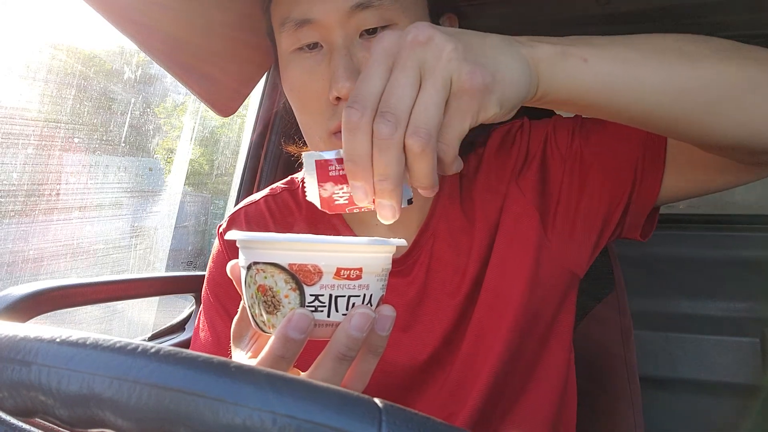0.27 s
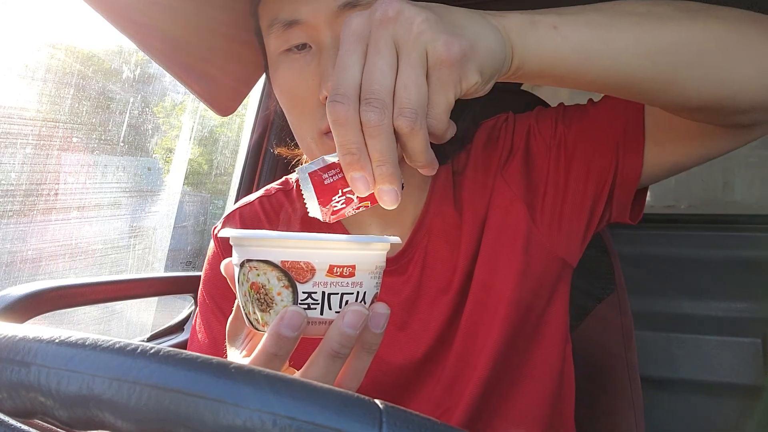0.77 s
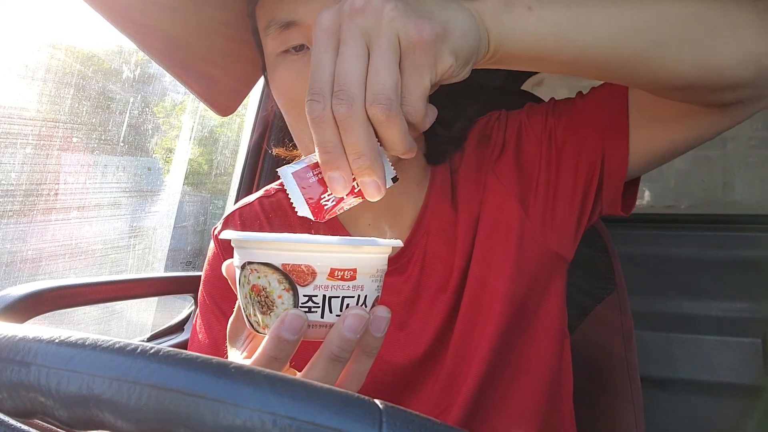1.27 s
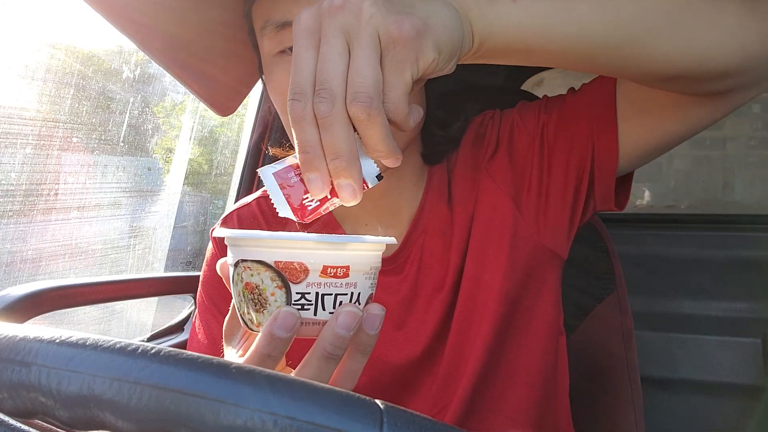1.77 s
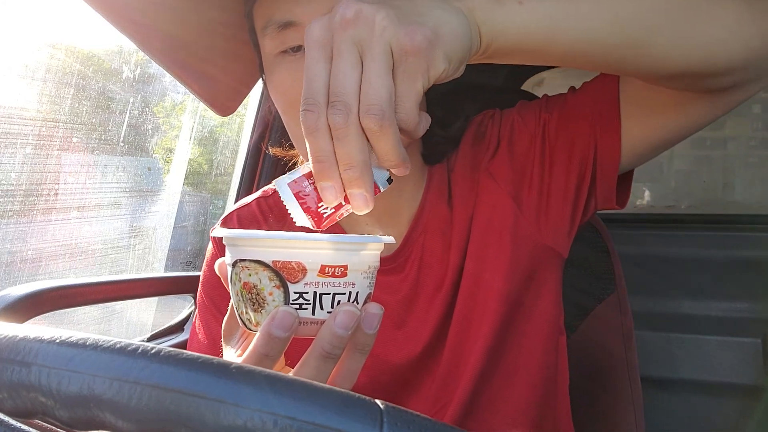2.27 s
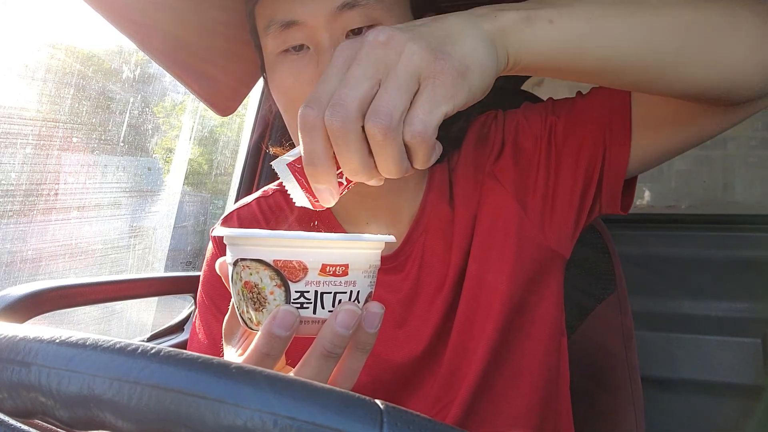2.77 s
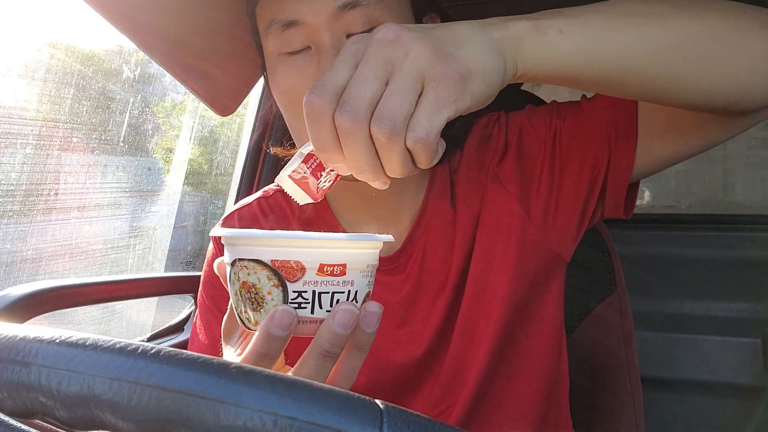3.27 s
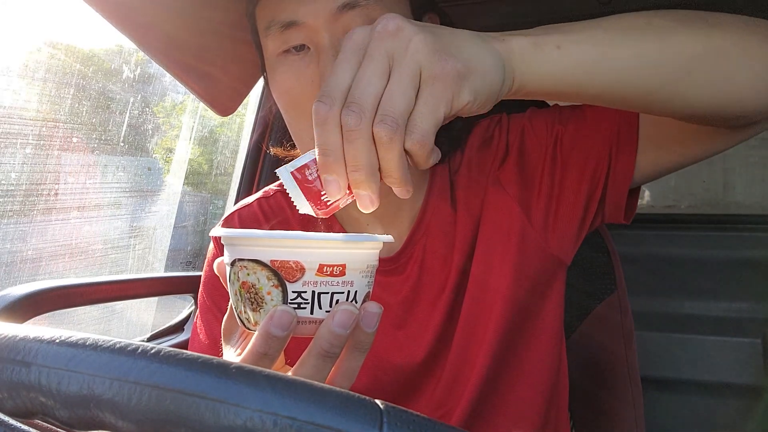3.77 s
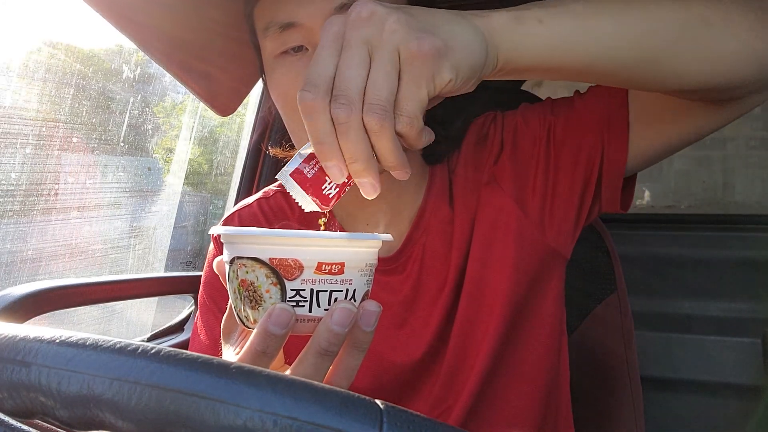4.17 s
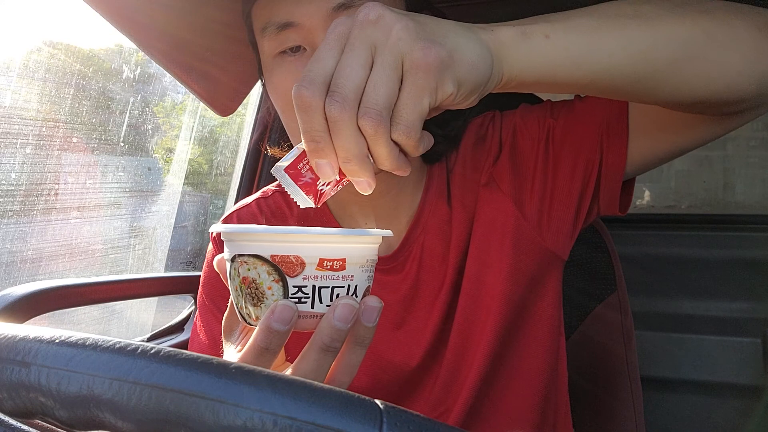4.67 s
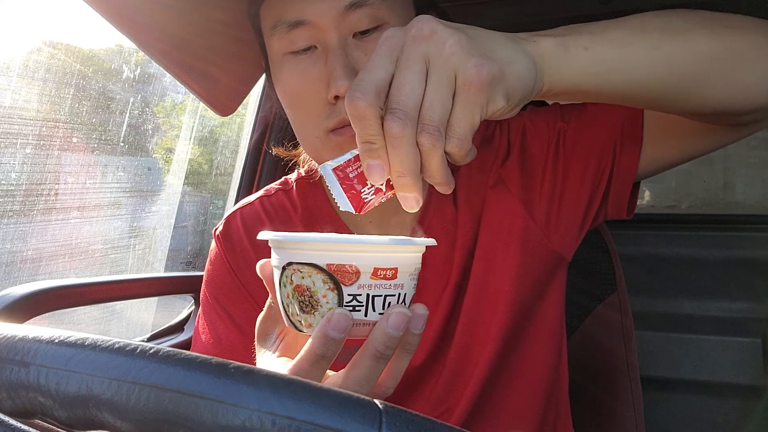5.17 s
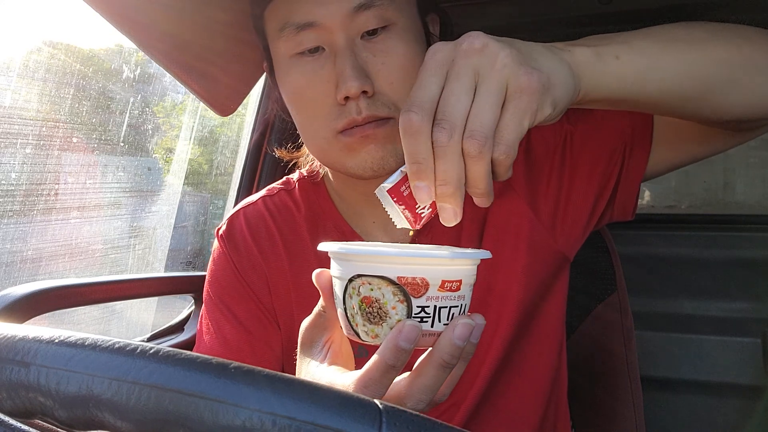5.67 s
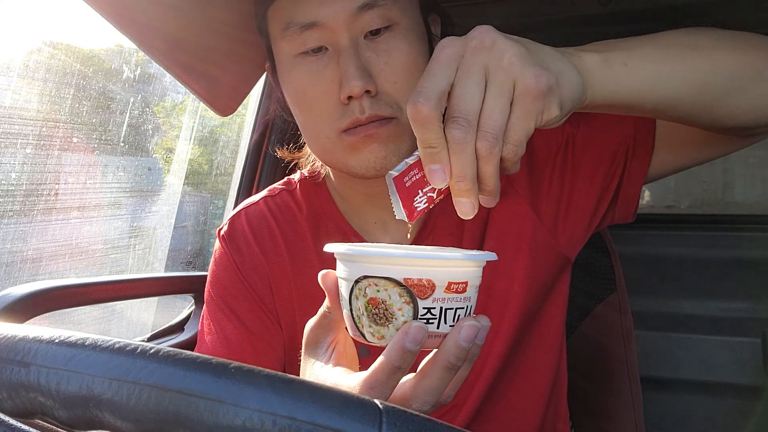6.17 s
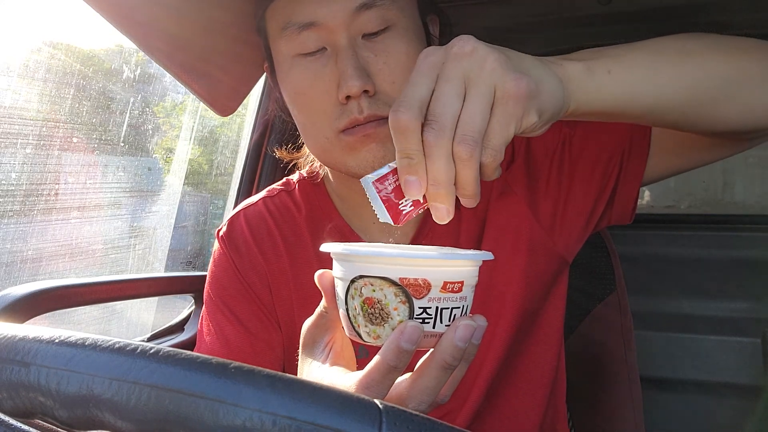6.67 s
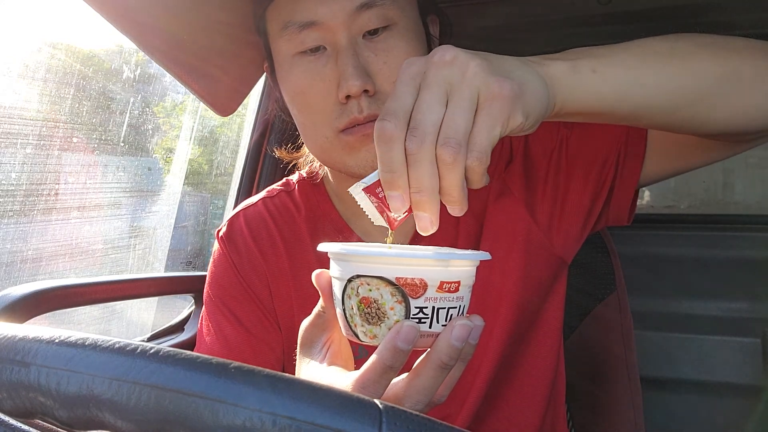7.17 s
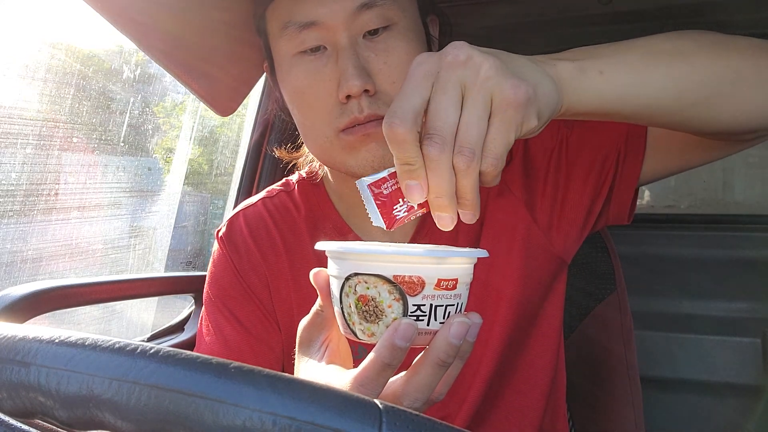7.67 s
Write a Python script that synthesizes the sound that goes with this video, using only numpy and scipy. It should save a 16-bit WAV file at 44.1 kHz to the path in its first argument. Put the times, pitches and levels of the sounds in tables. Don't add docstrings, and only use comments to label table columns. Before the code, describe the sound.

Close, crisp crinkling of a foil packet worked by fingers, with irregular sharp snaps, soft low pops and faint engine rumble in a small cab.

```python
import sys
import numpy as np
from scipy import signal
from scipy.fft import rfft, irfft, next_fast_len
from scipy.io import wavfile
from scipy.ndimage import map_coordinates

SR = 44100
rng = np.random.default_rng(int(sys.argv[2]) if len(sys.argv) > 2 else 0)


def digitize_waveform(pressure):
    field = np.atleast_2d(pressure).T
    bounded = np.clip(field, -1, 1)
    quanta = np.round(bounded * 32767).astype(np.int16)
    wavfile.write(sys.argv[1], SR, quanta)


def convert_level_to_amplitude(level_db):
    exponent = np.asarray(level_db, float) / 20
    return 10 ** exponent


N = 349272
BLOCK = 4096
SIZZLE_LOW_HZ, SIZZLE_HIGH_HZ = 7900, 18000


def unit(x):
    return x / np.sqrt(np.mean(x ** 2) + 1e-20)


def unit_rows(x):
    return x / np.sqrt(np.mean(x ** 2, axis=1, keepdims=True))


def along(points, hz):
    point_hz, value = np.transpose(points)
    return np.interp(np.log(hz + 1), np.log(point_hz + 1), value)


def wobble(rate):
    knots = rng.standard_normal(int(N * rate / SR) + 4)
    return map_coordinates(knots, [np.arange(N) * rate / SR])


def filtered(x, response):
    size = next_fast_len(N + SR // 2)
    hz = np.fft.rfftfreq(size, 1 / SR)
    return irfft(rfft(x, size) * response(hz), size)[..., :N]


def causal(points):
    def response(hz):
        cepstrum = irfft(np.log(convert_level_to_amplitude(along(points, hz)) + 1e-6))
        half = len(cepstrum) // 2
        cepstrum[1:half] *= 2
        cepstrum[half + 1:] = 0
        return np.exp(rfft(cepstrum))
    return response


def band(x, low_hz, high_hz):
    sos = signal.butter(2, [low_hz, high_hz], "bandpass", fs=SR, output="sos")
    return signal.sosfilt(sos, x)


def rush(spectrum, likeness):
    def split(hz):
        angle = np.arccos(np.clip(along(likeness, hz), -1, 1)) / 2
        return convert_level_to_amplitude(along(spectrum, hz)) * np.array([np.cos(angle), np.sin(angle)])
    mid, side = filtered(rng.standard_normal((2, N)), split)
    return unit(np.array([mid + side, mid - side]))


# start_s [s], peak_db
# [dB], ring_hz [Hz], sizzle_db [dB]
FLIPS = [(0.0189, -29.5, 3920, -2.5), (0.0498, -32.5, 2310, -10), (0.2166, -36, 3160, -4),
         (0.2333, -32, 3780, -19), (0.259, -43.5, 4030, 0.5), (0.2833, -31.5, 3840, -1.5),
         (0.3992, -26.5, 6230, -7.5), (0.6024, -43, 3350, 4), (0.6094, -33, 2350, -38),
         (0.6398, -33.5, 3300, -32), (0.6804, -28, 6030, 3.5), (0.7243, -34, 5900, -7.5),
         (0.8058, -40.5, 1610, -13), (0.841, -32.5, 5750, -6), (0.8713, -38, 3200, 0),
         (0.8945, -28, 3670, -4), (0.9254, -24.5, 2200, -7.5), (0.9868, -34, 1640, -7),
         (1.0044, -28.5, 4400, -7), (1.1139, -32.5, 4310, -18), (1.2256, -30.5, 2430, 2.5),
         (1.2484, -32, 3380, -11), (1.3107, -42.5, 3460, -8), (1.3911, -30, 3570, -4.5),
         (1.4686, -44, 3600, -11), (1.4864, -42, 3490, -4.5), (1.5198, -35.5, 3200, -7),
         (1.5696, -27.5, 3200, 0), (1.6518, -39, 4500, -13), (1.6792, -35, 3270, -17),
         (1.7547, -39.5, 4040, 2), (1.798, -42, 4310, -8), (1.853, -45, 3350, -1.5),
                (1.9173, -46, 2340, 2.5), (1.9384, -27, 3570, -4), (1.9817, -37.5, 3200, -11),
                (2.0547, -44, 6370, -1), (2.0769, -27, 3330, -3), (2.1403, -29, 5860, -11),
                (2.1952, -51, 5100, -4), (2.2332, -35, 3550, -4), (2.2595, -32.5, 2180, -33),
                (2.2847, -32.5, 3430, -28), (2.3097, -22.5, 3300, -7.5), (2.3543, -39.5, 6300, -19),
                (2.3715, -37.5, 4800, -16), (2.411, -29, 3370, -5.5), (2.4523, -37.5, 2400, -26),
                (2.481, -46, 3070, -21), (2.513, -47, 1630, -18), (2.5317, -45, 2280, -5),
                (2.565, -37, 4300, -6), (2.583, -36, 3280, 3), (2.742, -30, 3560, -6),
                (2.7904, -33.5, 1450, -13), (2.8573, -43, 3260, -5), (2.926, -37, 2520, -4),
                (3.0089, -36, 3360, -12.5), (3.061, -38, 3160, -2),
         (3.532, -27, 6360, -6.5), (3.639, -45, 3740, -10), (3.616, -31, 3740, -8.5),
            (3.675, -37, 6560, -2.5), (3.7336, -41, 5500, -8), (3.7859, -31, 3220, -8),
            (3.8582, -41, 3600, -12), (3.997, -34.5, 2920, -4), (4.088, -24, 2150, -4),
            (4.123, -27, 3690, -5), (4.1518, -30.5, 3540, -10), (4.273, -44, 3210, -12),
            (4.3014, -30, 3400, -4.5), (4.3554, -31, 4130, -4), (4.3801, -28.5, 3300, -12),
            (4.4108, -36, 4310, 1), (4.462, -45.5, 4430, -41), (4.5419, -20.5, 3570, -3),
            (4.5747, -31.5, 5440, 0), (4.619, -40.5, 4310, 0), (4.6349, -33.5, 3530, -14),
            (4.7044, -33.5, 3300, -19), (4.7281, -31, 3200, -12), (4.7626, -42.5, 1530, -27),
            (4.7996, -34, 3500, -7), (4.8446, -40.5, 3140, -2), (4.9094, -23, 3460, -8),
            (4.9761, -27.5, 4470, -1),
         (5.0423, -32.5, 6900, -4), (5.0904, -41.5, 6440, -0.5), (5.1141, -34, 4600, -11),
              (5.2146, -24.5, 3970, -50), (5.257, -33.5, 4310, -34), (5.3189, -42.5, 2200, -26),
              (5.3581, -24, 3840, -13), (5.414, -28.5, 4310, -4.5), (5.4728, -42.5, 2040, -18),
              (5.4995, -38.5, 3780, -21), (5.5582, -38, 4240, -40), (5.6188, -35, 6000, -3),
              (5.723, -31, 4150, -10), (5.744, -30.5, 4130, -14), (5.8378, -37.5, 3970, -26),
              (5.865, -39.5, 4310, -10), (5.9656, -49, 4300, -25), (5.9812, -30.5, 2100, -5),
              (6.007, -33.5, 3570, -11), (6.0542, -42.5, 4310, -0.5), (6.1497, -30, 3870, -21),
              (6.1812, -29.5, 3570, -28), (6.2, -36, 4340, 0), (6.2321, -19.5, 5110, -7.5),
              (6.2655, -24.5, 3570, -37), (6.3116, -33, 4240, -9), (6.3342, -27.5, 4150, -11),
              (6.409, -28.5, 4060, -44), (6.4377, -29.5, 2820, -8), (6.5117, -25, 4580, -4.5),
         (6.6138, -30.5, 3460, -11), (6.625, -22, 3900, -3.5), (6.6714, -19, 5520, -11),
            (6.736, -41, 4200, -12), (6.754, -30.5, 4310, 1), (6.855, -43, 4580, -19),
            (6.8728, -33.5, 4310, -7.5), (6.9022, -20.5, 4360, -8.5), (6.934, -26, 4450, -15),
            (6.9493, -21, 3860, -11.5), (7.0029, -37, 4670, -10), (7.0391, -34, 3200, -10),
            (7.0886, -31.5, 3400, -3), (7.123, -28, 4300, -4), (7.164, -34, 4100, -15),
            (7.2513, -28, 2230, -11), (7.2636, -27.5, 2210, -15), (7.3364, -37.5, 4540, -7.5),
            (7.4651, -36, 4840, -7), (7.492, -38, 1850, -16), (7.528, -32, 4870, -6),
            (7.555, -27.5, 3370, -10), (7.569, -27.5, 4310, -11.5), (7.662, -47.5, 2880, -18),
            (7.6939, -21.5, 2180, -3), (7.7308, -39, 4400, -6), (7.754, -21.5, 4300, -9.5),
            (7.787, -22.5, 3880, -16), (7.835, -29, 4250, -5), (7.896, -34, 4630, -8),
         (0.537, -37.5, 3420, -26), (3.378, -50.5, 6950, 4.5), (4.894, -36, 3800, 2),
                (5.3692, -20, 4200, -12), (7.797, -24.5, 3050, -28), (0.5254, -42, 3540, -12),
                (5.0368, -34.5, 4450, -11.5), (6.014, -37.5, 3860, -8), (6.347, -44, 4050, -15)]
# start_s [s], peak_db [dB], ring_hz [Hz],
# sizzle_db [dB]
SMALL_TICKS = [(0.1181, -60, 3230, -1), (0.174, -58, 3380, -2), (0.216, -49, 3970, -19),
               (0.2884, -27, 2400, -7), (0.371, -37.5, 1660, -17), (0.4499, -44, 4120, -12),
               (0.483, -41, 3550, -26), (0.499, -37, 3520, -9), (0.5581, -41, 4160, -6),
               (0.5934, -37, 2320, -22), (0.6984, -28, 3370, -14), (0.7364, -38, 3700, 4),
               (0.82, -33, 1640, -16), (0.9044, -30, 3120, -28), (0.9785, -37, 1630, -16),
               (1.019, -34, 4320, -3), (1.05, -40, 1640, -8), (1.063, -36.5, 3100, -25),
               (1.0934, -40.5, 3360, -18), (1.123, -30, 4020, 2), (1.1312, -31.5, 6300, -20),
               (1.17, -47.5, 4310, -10), (1.1922, -46.5, 1630, -7), (1.3468, -45, 4730, -6),
               (1.359, -46, 1520, -11), (1.458, -50, 3600, -13), (1.4954, -41, 3320, -24),
               (1.5356, -42, 3070, -22), (1.7418, -55, 3940, -17), (2.2644, -30.5, 2150, -30),
               (2.5981, -26, 3160, -12), (2.6144, -34, 3060, -13), (2.6374, -40, 3720, -9),
               (2.803, -36, 1580, -4.5), (3.4974, -56, 3350, -5), (3.5087, -50, 6300, -13),
               (3.759, -49, 4110, -13), (3.9257, -47.5, 2300, -15),
               (4.0343, -40.5, 3900, -23), (4.0652, -57, 2120, -17), (4.1482, -34, 3400, -16),
              (4.2472, -41, 1640, -27), (4.2904, -36, 3780, -20), (4.3062, -27.5, 3400, -17),
              (4.314, -42, 3700, -15), (4.321, -29, 4500, -16), (4.345, -42, 3650, -8),
              (4.3528, -30.5, 4220, -22), (4.4478, -44.5, 5460, -3), (4.7118, -32.5, 3240, -7),
              (4.7924, -44, 3200, -17), (4.8152, -37, 3300, -5), (5.1925, -45, 3480, -4),
              (5.3475, -34, 3570, -16), (5.385, -47, 4450, -9), (5.4012, -29, 4100, -10),
              (5.5485, -45, 4250, -1), (5.611, -36.5, 4250, -19), (5.6334, -37, 1650, -30),
              (5.652, -39, 1740, -20), (5.675, -44, 3560, -21), (5.7013, -43, 4030, -6),
              (5.83, -49, 4000, -23), (6.4284, -32, 2920, -10), (6.4534, -39, 4380, -18),
              (6.4774, -36.5, 4310, -17), (6.6394, -37, 2070, -7), (6.6884, -37, 4370, -2),
              (6.709, -43, 1930, 0), (6.7446, -37, 4310, -16), (7.032, -34, 2120, -24),
              (7.1264, -22.5, 6040, -23), (7.1732, -22, 3100, -12), (7.1852, -27, 4850, -20),
              (7.2062, -28, 2870, -11), (7.2946, -34, 2100, -20), (7.5104, -52, 4820, -20),
              (7.8167, -31, 3950, -11), (7.8483, -30.5, 2020, -0.5), (7.9154, -32.5, 4360, -8),
               (1.0106, -28.5, 4470, -9), (2.3044, -30, 3570, -16), (2.3163, -37, 3500, -22),
           (2.404, -32.5, 3570, -9), (2.5903, -34, 3070, -18), (4.5285, -42, 4300, -2),
           (4.8226, -47, 3100, -12), (4.9712, -37, 4500, -5), (5.3774, -29, 3570, -6),
           (7.6878, -33, 2060, -17), (7.7318, -27.5, 4310, -22)]


def creases():
    small = SMALL_TICKS
    ticks = [(s, db - 2.5, hz, sizzle_db) for s, db, hz, sizzle_db in small]
    return [*FLIPS, *ticks]


# peak_s [s of most pressure], crackle_db [dB], build_s [s], release_s [s]
PRESSES = [(0.0, -45, .1, 0.1), (0.282, -52, 0.25, 0.13), (0.521, -51, 0.28, 0.21), (0.71, -51, 0.1, 0.095),
           (0.92, -50.5, 0.3, 0.12), (1.02, -59, 0.29, 0.36), (1.25, -63.5, 0.43, 0.55),
           (1.559, -50.5, 0.15, 0.16), (1.9, -65, 0.96, 0.23), (2.088, -48.5, 0.072, 0.15),
           (2.27, -52.5, 0.094, 0.23), (2.593, -44.5, 0.24, 0.084), (2.83, -64, 0.6, 0.67),
           (3.34, -62, 0.29, 0.28), (3.648, -52, 0.17, 0.02), (4.01, -60.5, 0.98, 0.21),
           (4.358, -45.5, 0.24, 0.11), (4.57, -51.5, 0.11, 0.25), (4.829, -49, 0.17, 0.4),
           (5.88, -68.5, 0.35, 0.35), (5.391, -48, 0.074, 0.12), (5.74, -60, 0.7, 0.17),
           (6.01, -62, 0.23, 0.04), (6.179, -64, 0.15, 0.27), (6.33, -39, 0.086, 0.071),
           (6.69, -53.5, 0.49, 0.24), (7.192, -55.5, 0.43, 0.042), (7.56, -68.5, 0.96, 0.41),
           (7.78, -52.5, 0.15, 0.31), (3.53, -55.5, 0.086, 0.052)]


def pressure():
    t = np.arange(N) / SR
    level_db = np.full(N, -109.0)
    for peak_s, db, build_s, release_s in PRESSES:
        before = (peak_s - t) / max(build_s, 0.01)
        after = (t - peak_s) / max(release_s, 0.01)
        apart = np.where(t < peak_s, before, after)
        level_db = np.maximum(level_db, db - 38 * apart)
    return convert_level_to_amplitude(level_db)


def crackle():
    stress = np.zeros((2, N))
    for s, db, hz, sizzle_db in creases():
        stress[:, round(s * SR)] += convert_level_to_amplitude([db, db + sizzle_db + 18.5])
    t = np.arange(-2048, 2048) / SR
    before_s, before_db, after_s = 0.02, -13, 0.057
    spread = convert_level_to_amplitude(np.where(t < 0, 60 * t / before_s + before_db, -60 * t / after_s))
    crowd = convert_level_to_amplitude(-23) * signal.fftconvolve(stress, spread[None], "same", axes=1)
    level = crowd + convert_level_to_amplitude([[-8], [-7]]) * pressure()

    starts = np.flatnonzero(rng.random(N) < 900 * convert_level_to_amplitude(3 * wobble(40)) / SR)
    size = convert_level_to_amplitude(-4 * np.log(rng.random(len(starts)) + 0.07))
    pitch = rng.standard_normal(len(starts))
    hz = np.clip(3600 * np.exp(0.45 * pitch), 1500, 14000)[:, None]
    k = np.arange(128)
    cycles = hz * k / SR
    rings = np.sin(2 * np.pi * cycles) * np.exp(-cycles / 1.49) * np.sqrt(hz / 3600)
    rings = rings + 0.7 * (k == 0)
    places = starts[:, None] + k
    ticks = np.bincount(places.ravel(), (size[:, None] * rings).ravel(), N + len(k))[:N]

    grain = unit(ticks) + 0.3 * rng.standard_normal(N)
    treble = filtered(grain, lambda f: 1 / (1 + (SIZZLE_LOW_HZ / (f + 1)) ** 6))
    return level[0] * (grain - treble) + level[1] * treble


# freq_hz [Hz], level_db [dB per Hz]
HUM = [(10, -76), (18, -1), (30, -16.5), (42, -2), (52, -8), (63, 0), (73, -13.5), (95, -13.5),
       (140, -23.5), (200, -31), (330, -27), (450, -44.5), (520, -38.5), (900, -120)]
# freq_hz [Hz], likeness [0 to 1]
HUM_LIKENESS = [(60, 0.93), (130, 0.81), (290, 0.8), (500, 0.21)]
# time_s [s], level_db [dB]
IDLE = [
    (0.0, -63),
    (0.5, -57.5),
    (1.3, -62),
    (2.4, -62),
    (7.92, -63),
]


def engine():
    rumble = convert_level_to_amplitude(1.5 * wobble(3.154)) * rush(HUM, HUM_LIKENESS)
    firing_hz = 63.5 + 2.493 * wobble(7.1)
    firing = np.sin(2 * np.pi * np.cumsum(firing_hz) / SR) * convert_level_to_amplitude(-3 + 1.4 * wobble(2.7))
    time_s, idle_db = np.transpose(IDLE)
    level_db = np.interp(np.arange(N) / SR, time_s, idle_db)
    return convert_level_to_amplitude(level_db + [[0.4], [-0.4]]) * (rumble + firing)


# freq_hz [Hz], level_db [dB per Hz]
HISS = [(300, -120), (450, -14), (800, -2.5), (2000, -18), (5000, -32), (16000, -23)]


def hiss():
    return convert_level_to_amplitude(-83.5) * rush(HISS, [(500, 0.027)])


def snaps():
    out, t = np.zeros(N + SR), np.arange(512) / SR
    s, db, hz, sizzle_db = np.transpose(creases())[:, :, None]
    chance = rng.standard_normal((len(s), len(t)))
    burst = 0.2 * chance * convert_level_to_amplitude(-60 * t / 0.013) + (t == 0)

    body = unit_rows(band(burst, 1600, 6130))
    ring = 6 * convert_level_to_amplitude(-0.5 - 60 * t / 0.01) * np.sin(2 * np.pi * hz * t)
    thud_db = -22 + 3 * chance[:, :1] + 8.0
    thud = convert_level_to_amplitude(thud_db) * unit_rows(band(burst, 200, 2400))
    sizzle = convert_level_to_amplitude(sizzle_db + 3.0) * unit_rows(band(burst, SIZZLE_LOW_HZ, SIZZLE_HIGH_HZ))
    f = np.fft.rfftfreq(len(t), 1 / SR)
    resonance = 1j * f * hz * 0.55 / (hz ** 2 - f ** 2 + 1j * f * hz * 0.66)
    facet = unit_rows(irfft(rfft(burst) * resonance ** 2))

    clicks = convert_level_to_amplitude(db - 25.5) * (0.65 * body + 0.64 * facet + ring + thud + sizzle)
    starts = np.round((s[:, 0] + 0.0006) * SR).astype(int)
    for start, click in zip(starts, clicks):
        out[start:][:len(t)] += click
    return out[:N]


def thumps(events):
    out, t = np.zeros(N + SR), np.arange(BLOCK) / SR
    for s, db, low_hz, high_hz, t60_s in events:
        noise = unit(band(rng.standard_normal(len(t)), low_hz, high_hz))
        out[round(s * SR):][:len(t)] += convert_level_to_amplitude(db - 60 * t / t60_s) * noise
    return out[:N]


# start_s [s], peak_db [dB], pitch_hz [Hz]
POPS = [(0.049, -47, 1190), (0.217, -49.5, 865), (0.282, -45, 1210), (0.397, -53, 1280), (0.498, -49, 1220),
        (0.557, -52, 870), (0.64, -48, 940), (0.7, -44.5, 1240), (0.893, -45, 1310), (0.927, -46.5, 1250),
        (1.052, -47, 1080), (1.225, -54, 840), (1.569, -49, 830), (2.077, -38.5, 1210),
        (2.231, -50.5, 1240), (2.373, -60, 1210), (2.409, -43, 1370), (2.599, -44, 1170),
        (2.925, -45.5, 830), (3.061, -67, 1155), (3.615, -41.5, 1400), (3.789, -52, 1360),
        (4.087, -50, 1280), (4.301, -52, 875), (4.355, -53, 1190), (4.542, -53, 900), (5.042, -57, 1030),
        (5.215, -71, 860), (5.257, -55.5, 790), (5.366, -51, 1210), (5.473, -59, 1190), (6.006, -61, 750),
        (6.15, -55, 1210), (6.319, -49.5, 1200), (6.514, -53, 1220), (5.99, -61, 1620), (7.038, -54, 990),
        (7.173, -51, 804), (7.54, -47, 1180), (7.834, -48.5, 815)]


def wall_pops():
    wide, t60_s = 1.205, 0.044
    return thumps([(s, db - 18, hz / wide, hz * wide, t60_s) for s, db, hz in POPS])


# start_s [s], level_db [dB], low_hz [Hz], high_hz [Hz]
KNOCKS = [
    (0.282, -57.5, 200, 360),
    (4.543, -57.5, 410, 870),
    (0.47, -64.5, 630, 750),
    (2.078, -77, 250, 480),
    (2.2, -58, 480, 490),
    (2.928, -60, 660, 910),
    (4.2, -69, 610, 1040),
    (5.1, -65, 390, 950),
    (1.568, -65, 580, 820),
    (7.556, -77, 570, 1300),
]


def tub_knocks():
    return thumps([(*row, 0.024) for row in KNOCKS])


# freq_hz [Hz], level_db [dB per Hz]
FILM = [(200, -45), (450, -22), (850, -7), (1130, -9.5), (1500, -3), (2750, -1.5), (4200, 4.5), (4700, 0.5),
        (6900, 4.5), (7700, -1), (8400, 5), (11000, 3.5), (16000, -1)]
# pitch_hz [Hz], width_hz [Hz], level_db [dB]
TUB = [
    (1608, 93, 8),
    (2120, 64, 0),
    (3570, 29, -5.5),
    (4310, 86, -5),
]
# freq_hz [Hz], left_over_right_db [dB]
LEFT = [(500, 3), (1400, 0), (2800, 3), (5600, 1.2), (10000, 3.5), (14000, 2.5)]


def sachets():
    def path(f):
        peaks = 1
        for hz, width_hz, db in TUB:
            damping = 1j * f * width_hz
            peaks = peaks + convert_level_to_amplitude(db - 4.0) * damping / (hz * hz - f * f + damping)
        ports = convert_level_to_amplitude(along(LEFT, f) * [[0.5], [-0.5]])
        return causal(FILM)(f) * peaks * ports
    return filtered(snaps() + crackle(), path)


# freq_hz [Hz], t60_s [s]
CAB_DECAY = [(500, 0.0088), (1500, 0.076), (4000, 0.079), (9000, 0.06), (15000, 0.064)]


def tails(count):
    noise = rng.standard_normal((count, 2, BLOCK))
    hz, t, z = signal.stft(noise, SR, nperseg=128)
    fade = convert_level_to_amplitude(-60 * t / along(CAB_DECAY, hz)[:, None])
    tail = signal.istft(z * fade, SR, nperseg=128)[1][..., :BLOCK]
    tail *= 1 + 0.66 * convert_level_to_amplitude(-60 * np.arange(BLOCK) / SR / 0.012)
    return tail / np.linalg.norm(tail, axis=-1, keepdims=True)


# freq_hz [Hz], level_db [dB]
CAB_ANSWER = [(600, -2), (3000, -1), (9000, -2.5), (15000, -3.5)]


def cab(x, still):
    out, direct = np.zeros((2, N + 4 * BLOCK)), np.zeros((2, N + 4 * BLOCK))
    starts = np.arange(0, N, BLOCK)
    fresh = tails(len(starts) + 1)
    wander = rng.random(len(starts)) ** (0.4 + 4 * starts / N)
    lags = np.round(3 + (25 - 3) * wander).astype(int)
    for start, changing, lag in zip(starts, fresh[1:], lags):
        piece = x[:, start:start + BLOCK]
        answer = np.sqrt(still) * fresh[0] + np.sqrt(1 - still) * changing
        wet = signal.fftconvolve(piece, answer, axes=1)
        out[:, start + 50:][:, :wet.shape[1]] += wet
        direct[0, start:][:piece.shape[1]] += piece[0]
        direct[1, start + lag:][:piece.shape[1]] += piece[1]
    return direct[:, :N] + filtered(out[:, :N], causal(CAB_ANSWER))


def scene():
    film = sachets()
    low_sounds = convert_level_to_amplitude(12.0) * (tub_knocks() + wall_pops())
    return cab(film + low_sounds, still=0.16) + engine() + hiss()


def band_limit(x):
    return signal.sosfilt(signal.butter(12, 16830, fs=SR, output="sos"), x)


def record(dry):
    roll_off = [(15600, 4.5), (16000, -18.0), (16700, -53.0)]  # freq_hz, level_db
    mix = filtered(dry, lambda hz: convert_level_to_amplitude(along(roll_off, hz)))
    return band_limit(mix)


dry = scene()
out = record(dry)
digitize_waveform(out)
```